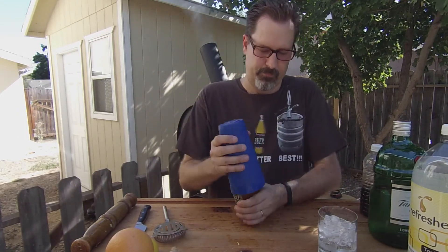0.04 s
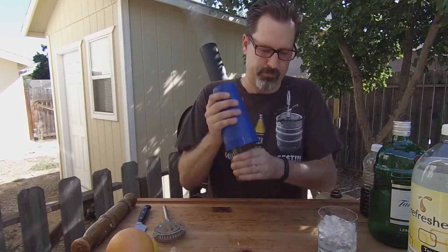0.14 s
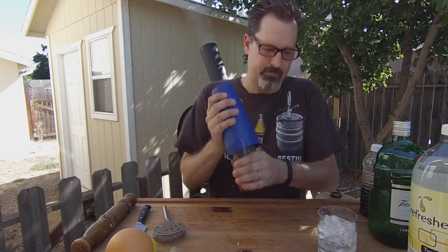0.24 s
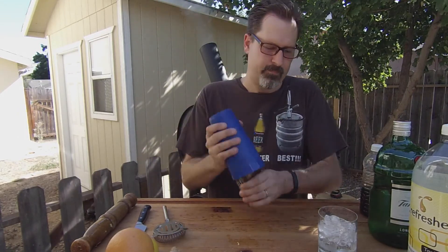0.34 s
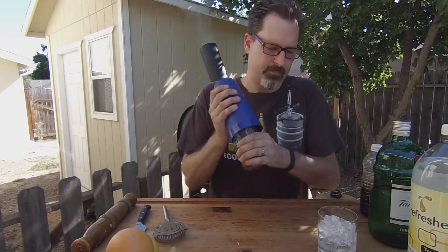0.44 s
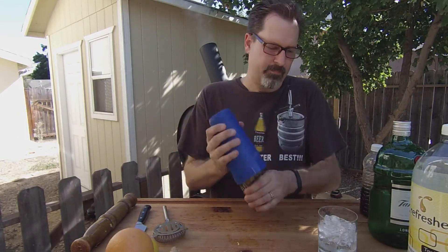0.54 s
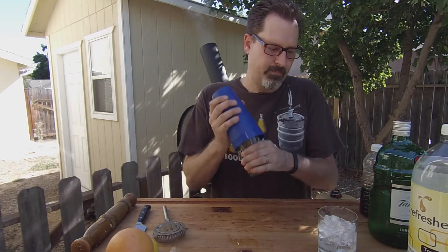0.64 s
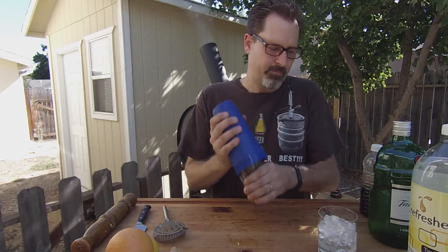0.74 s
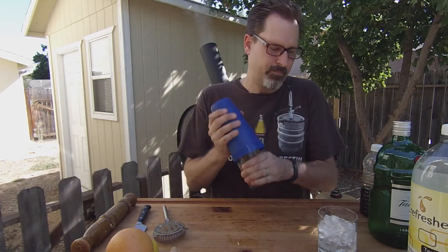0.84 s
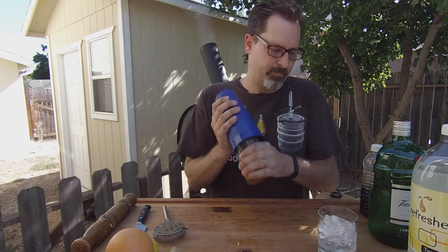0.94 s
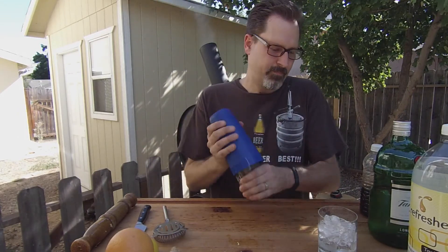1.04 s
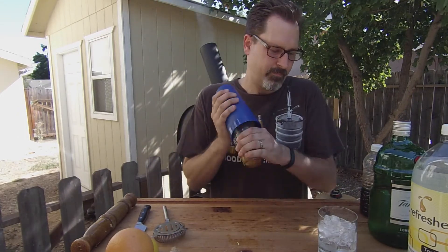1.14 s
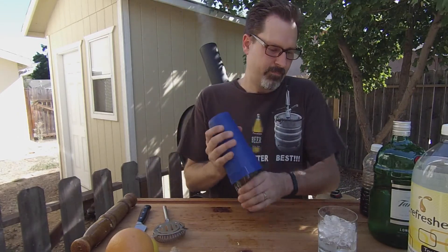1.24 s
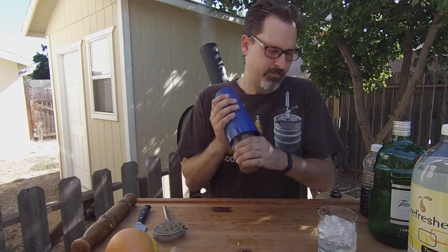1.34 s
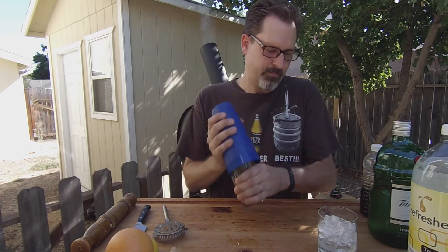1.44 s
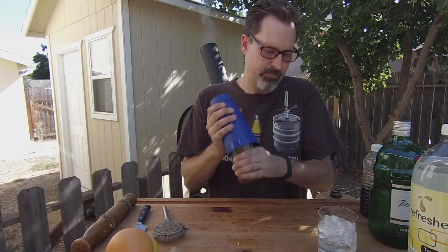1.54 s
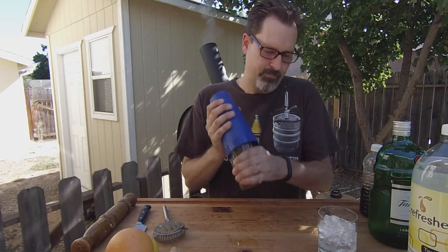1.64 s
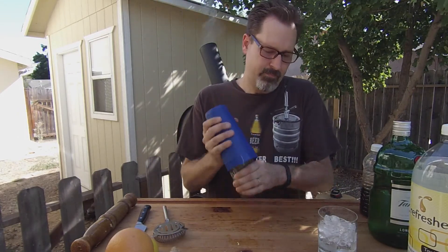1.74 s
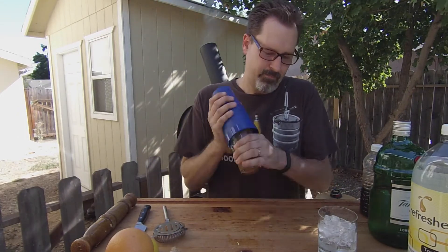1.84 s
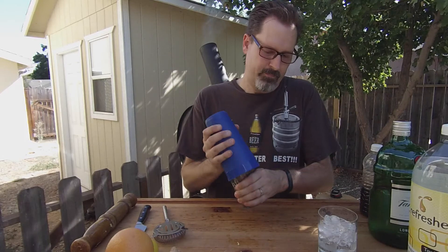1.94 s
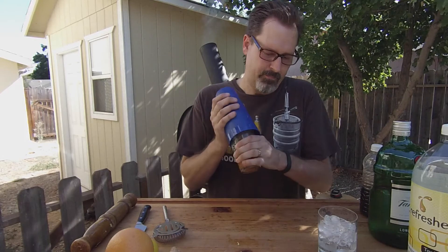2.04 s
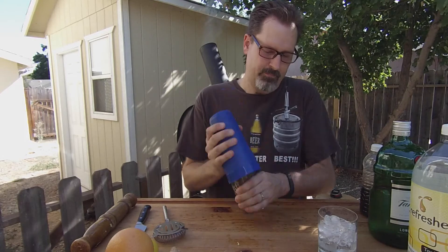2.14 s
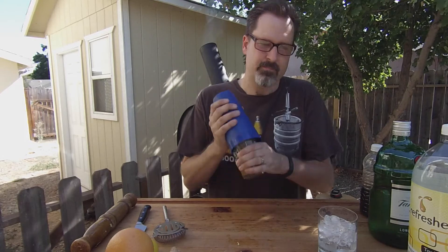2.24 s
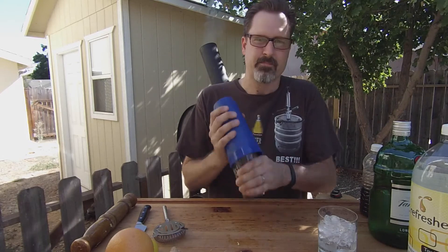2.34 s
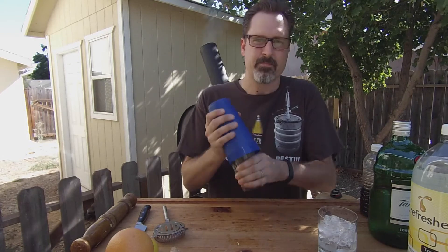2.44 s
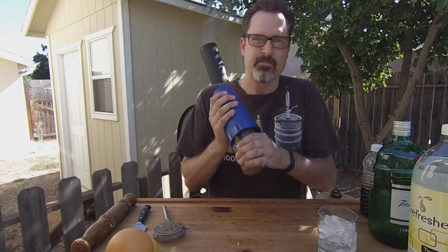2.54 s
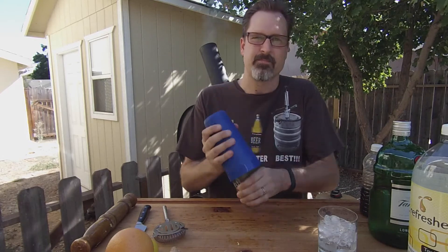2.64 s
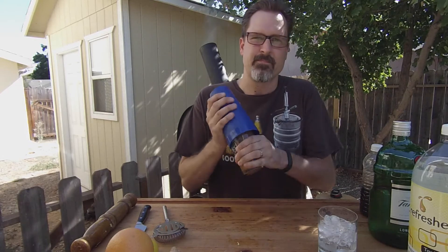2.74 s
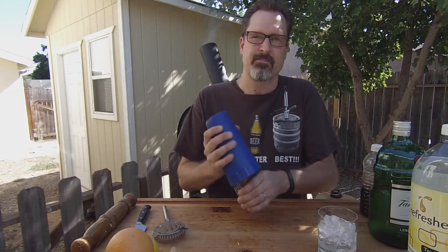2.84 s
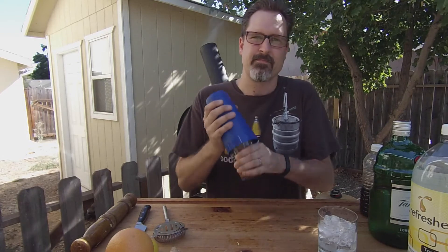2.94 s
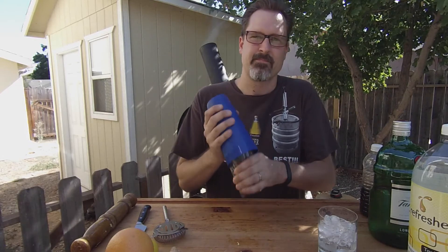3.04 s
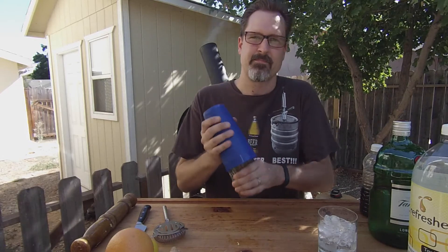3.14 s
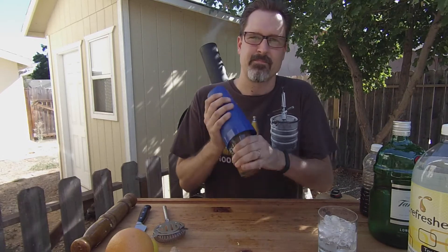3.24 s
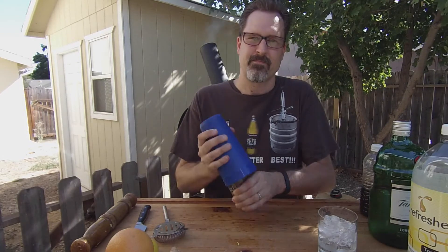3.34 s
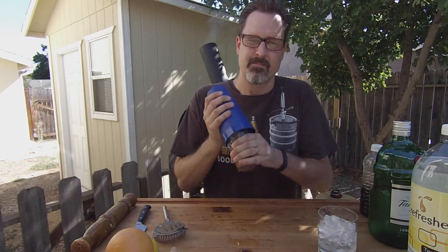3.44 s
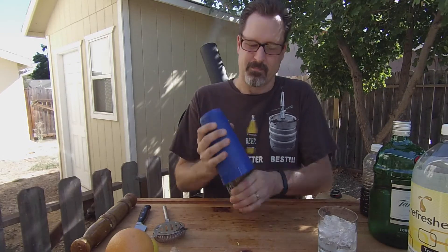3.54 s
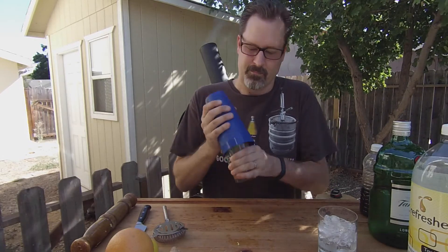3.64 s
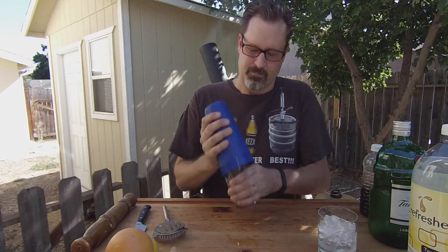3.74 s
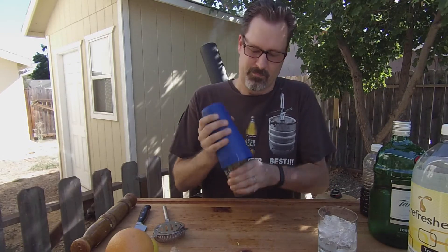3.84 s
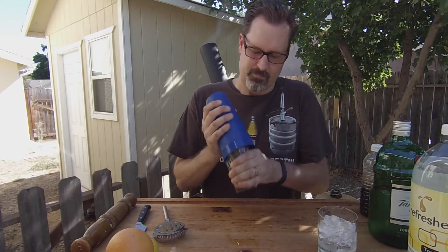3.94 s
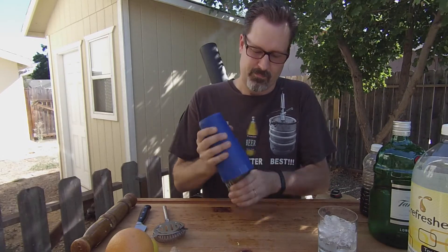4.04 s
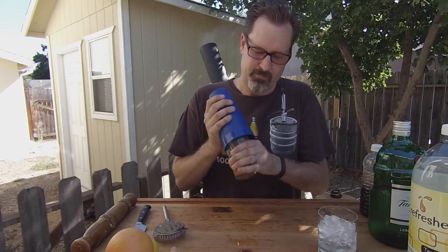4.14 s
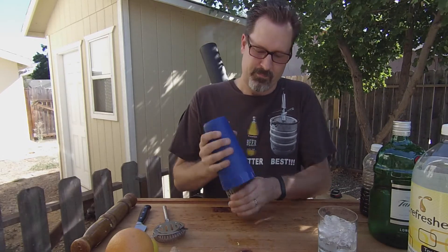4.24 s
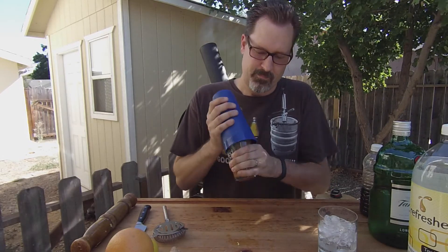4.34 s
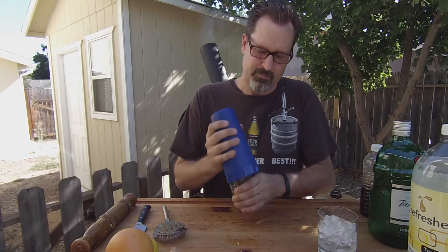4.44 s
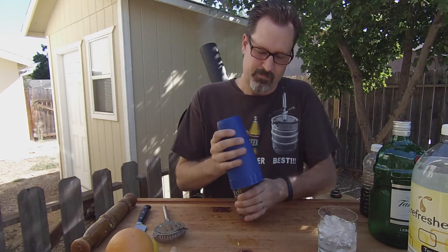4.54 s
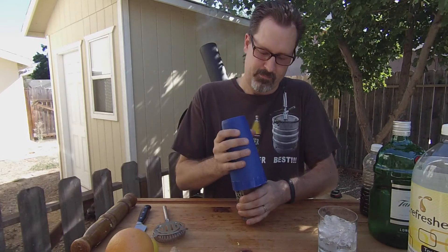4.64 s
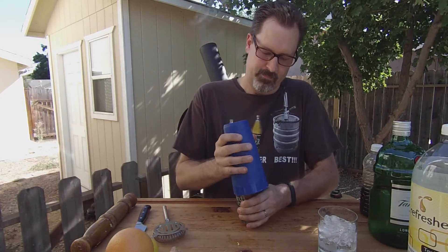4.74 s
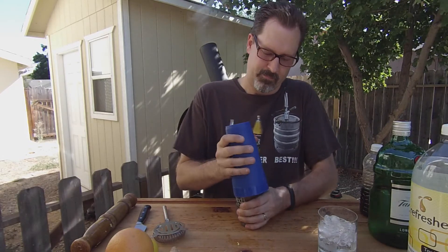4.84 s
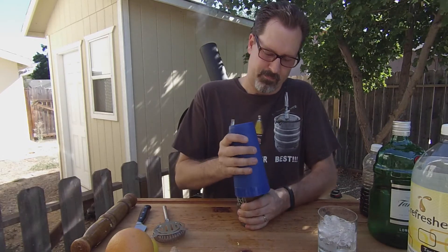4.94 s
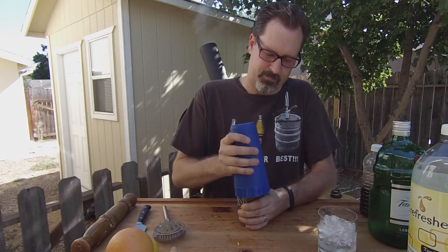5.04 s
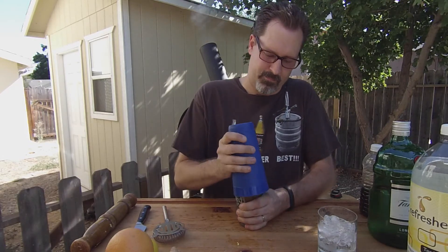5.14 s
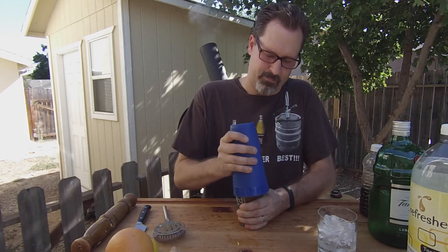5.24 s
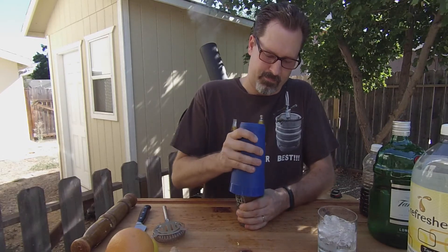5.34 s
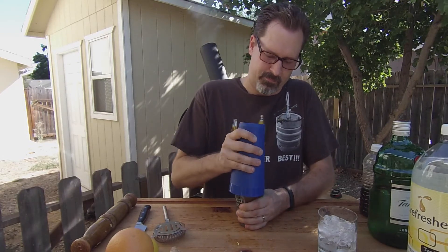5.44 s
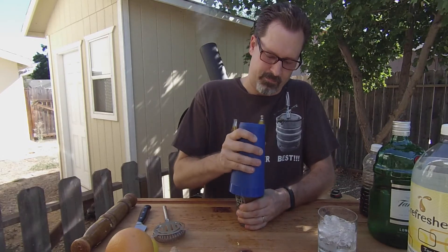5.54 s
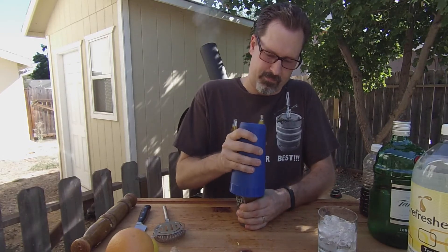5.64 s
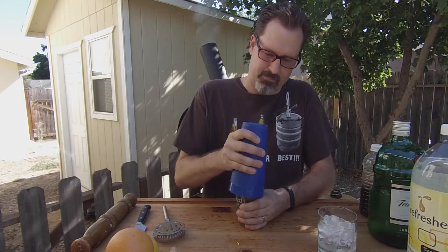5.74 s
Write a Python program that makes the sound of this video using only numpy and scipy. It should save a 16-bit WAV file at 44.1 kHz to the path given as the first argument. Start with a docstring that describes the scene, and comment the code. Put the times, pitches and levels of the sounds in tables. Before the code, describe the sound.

Quiet outdoor air with low rumble and a faint shift of ice opens the scene. At about 0.25 s a few clacks start fast, hard shaking that continues to about 4.6 s. Roughly every 0.23 s a bright burst of cubes strikes the metal end, short and crackling with a brief damped metallic ring; about a tenth of a second later the load slams into the glass end with a wet slap and hollow plop around 1 kHz, its pitch varying. Loose rattle and hissing slush fill the gaps. The first metal hit, near 0.37 s, is especially bright; later surges are slightly softer. Shaking stops abruptly around 4.7 s. At 4.83 s the glass lands on a wooden table with a short, dull knock, followed by faint bumps at 5.0 and 5.13 s and a clearer double knock at 5.28 s. Ice ticks and settles near 5.35 s, leaving quiet air. Close sound, weak yard echoes.

```python
"""Ice shaken in a metal shaker

Ice and liquid surge from end to end of a metal shaker capped over a glass, in a fenced back yard.
Cubes rattle and clack as filtered noise and brief rings; liquid slaps into resonant pockets of air.
The shaking stops, the glass is set down on a wooden table, rocks, and the ice settles.
The table sounds as a bank of dying modes, the yard as scattered echoes over a hush and low rumble."""
import sys
import numpy as np
from scipy import signal
from scipy.io import wavfile
from scipy.ndimage import uniform_filter1d

SR = 44100
rng = np.random.default_rng(int(sys.argv[2]) if len(sys.argv) > 2 else 0)


def pcm_store(signal):
    """Save signal as 16-bit PCM."""
    levels = np.round(np.clip(np.atleast_2d(signal), -1, 1) * 32767)
    wavfile.write(sys.argv[1], SR, levels.astype(np.int16).T)


N = 255339

# Surges of ice: a first jerk, then each hit on the metal end: (time [s], relative level [dB],
# length [s], brightness [dB], delay of the fall after it [s], relative level of the fall [dB])
ICE_SURGES = [(0.303, -21, 0.024, 3, 0.15, -51), (.37, -18.5, .03, 14.5, 0.15, -23),
              (0.62, -21, .036, 3.5, 0.11, -28.5), (0.849, -19.5, 0.035, 3.5, 0.13, -25),
              (1.079, -20, 0.031, 4.5, 0.13, -26.5), (1.306, -20.5, 0.039, 3, 0.15, -26),
              (1.532, -17, .023, 2.5, 0.12, -27), (1.775, -20.5, .031, 2.5, 0.11, -25.5),
              (1.989, -20.5, 0.026, 3, .14, -28.5), (2.238, -19.5, .027, 5, 0.11, -28),
              (2.453, -20, .028, 4.5, 0.14, -29), (2.697, -23.5, 0.032, 4.5, .12, -29),
              (2.922, -18, .029, 4.5, 0.13, -28), (3.166, -21, .027, 2, .135, -27),
              (3.401, -21, 0.027, 1, 0.12, -28.5), (3.629, -24, 0.025, 2.5, 0.12, -30.5),
              (3.853, -23, 0.038, 2, 0.13, -29.5), (4.078, -21.5, .026, 5.5, 0.1, -29),
              (4.314, -22.5, 0.028, 4, 0.13, -28), (4.566, -25.5, 0.039, 6, 0.067, -46)]
# The load slams into the glass and shuts on a pocket of air, the larger the lower:
# (time [s], relative liquid level [dB], pocket pitch [Hz], relative ice level [dB])
GLASS_SLAMS = [(.312, -11.5, 1420, -18), (0.5119, -9, 1303, -9), (0.7213, -19.5, 1400, -12.5),
               (0.7802, -18.5, 1080, -20), (.8008, -19, 1030, -24), (0.9823, -14.5, 1345, -31),
               (1.2104, -17.5, 1095, -31), (1.2187, -13, 1090, -16), (1.2242, -21.5, 670, -28),
               (1.4467, -18, 794, -15.5), (1.6463, -15.5, 1140, -10.5), (1.6954, -21, 960, -42),
               (1.871, -21, 1440, -26), (1.8856, -10.5, 1090, -28), (2.1298, -14.5, 890, -14.5),
               (2.345, -16, 1250, -13.5), (2.397, -20.5, 880, -36), (2.541, -12.5, 1510, -9.5),
               (2.819, -7, 986, -12), (3.063, -17, 964, -29), (3.0853, -18, 910, -37),
               (3.3324, -20.5, 975, -22.5), (3.5446, -15.5, 1310, -25.5), (3.7295, -12, 1014, -9.5),
               (3.7623, -17.5, 833, -20.5), (3.967, -12.5, 1390, -11), (3.997, -18, 690, -23.5),
               (4.185, -13.5, 1046, -16), (4.2158, -19.5, 1490, -19), (4.3867, -19.5, 1340, -7),
               (4.4326, -25, 1360, -27)]
# Spectrum of ice in the liquid: (frequency [Hz], relative spectral level [dB])
LIQUID_COLOUR = [(120, -37.5), (300, -12), (550, -1), (900, -7), (1400, 4), (2200, 2), (3200, -1.5),
                 (4600, -4), (7500, -14), (10500, -49), (14500, -29.5)]


def gain_of(db):
    """Level in decibels as an amplitude ratio."""
    return 10 ** (np.asarray(db) / 20)


def evened(x):
    """Normalisation to unit rms, the root of the mean power."""
    return x / np.sqrt(np.mean(x ** 2) + 1e-20)


def seconds(size):
    """Sampling: a time axis of so many samples."""
    return np.arange(size) / SR


def add(mix, s, sound):
    """Superposition: a sound is summed into the mix, in place, at time s."""
    part = mix[max(round(s * SR), 0):][:len(sound)]
    part += sound[:len(part)]


def level(rows):
    """Amplitude envelope, linear in decibels between rows of (time [s], level [dB])."""
    return gain_of(np.interp(seconds(N), *np.transpose(rows)))


def coloured(x, points, size=4096):
    """Minimum-phase filtering: a causal response of unit energy with the given spectrum."""
    hz, db = np.transpose(points)
    log_hz = np.log(abs(np.fft.fftfreq(size, 1 / SR)) + 1)
    log_gain = np.log(gain_of(np.interp(log_hz, np.log(hz), db)))
    # The Hilbert transform of the log gain gives the minimum phase.
    spectrum = np.exp(np.conj(signal.hilbert(log_gain)))
    taps = np.fft.ifft(spectrum).real[:size // 2]
    return signal.oaconvolve(x, taps / np.linalg.norm(taps))[:len(x)]


def ring(t, hz, t60):
    """Damped free vibration: one mode that falls by 60 dB in t60 seconds."""
    return np.sin(2 * np.pi * hz * t) * gain_of(-60 * t / t60)


def air(hush_db=-52, rumble_db=-2.0, puff_s=0.028):
    """Broadband ambience: a steady outdoor hush, and moving air as low noise that swells in puffs."""
    # Spectrum of the still yard: (frequency [Hz], relative spectral level [dB])
    hush_colour = [(12, -21), (20, -16.5), (54, -17), (174, -9), (235, -7), (347, -11.5), (603, -18.5),
                   (865, -15.5), (1140, -22.5), (10200, -43), (13100, -49), (15000, -87)]
    # Low rumble of moving air: (time [s], relative level [dB])
    rumble_levels = [(0, -41.5), (.3, -41.5), (1.6, -39.5), (1.9, -46.5), (2.5, -49.5), (3.2, -45),
                     (3.8, -49.5), (5.1, -44.5), (5.79, -52)]
    # Spectrum of the rumble: (frequency [Hz], relative spectral level [dB])
    rumble_colour = [(15, -8), (42, 3.5), (70, -4), (110, -2), (160, -18), (300, -26), (1000, -77)]
    # Puffs of air on the microphone: (time [s], relative level [dB])
    puffs = [(.49, -37.5), (1.25, -36), (2.84, -34)]
    hush, rumble = rng.standard_normal((2, N))
    breeze = level(rumble_levels)
    for s, db in puffs:
        breeze = breeze + gain_of(db) * np.exp(-((seconds(N) - s) / puff_s) ** 2)
    still = gain_of(hush_db) * evened(coloured(hush, hush_colour, size=16384))
    moving = gain_of(rumble_db) * breeze * evened(coloured(rumble, rumble_colour, size=16384))
    return still + moving


def yard(x, wet_db=-12.0, t60=0.4, dull_hz=4000, echoes_per_s=1500):
    """Reverberation: weak scattered echoes from table, shed and fence, as sparse decaying impulses."""
    t = seconds(size=20000)
    sparse = rng.standard_normal(len(t)) * (rng.random(len(t)) < echoes_per_s / SR)
    taps = sparse * (t > .004) * gain_of(-60 * t / t60)
    dulling = signal.butter(1, dull_hz, fs=SR, output="sos")
    tail = signal.sosfilt(dulling, taps / np.linalg.norm(taps))
    return x + gain_of(wet_db) * signal.oaconvolve(x, tail)[:N]


def knocks(lowest_hz=160, rise_s=0.0033, clatter_db=-5.5, clatter_t60=0.041, node_depth=0.32):
    """Modal excitation: the glass lands on one edge, then its whole rim; table rings, boards clatter."""
    # Glass meeting the table: (time [s], relative level [dB], pitch above which the blow is soft [Hz],
    # bass tilt [dB], pitch of the mode with a node at that spot [Hz],
    # delay of the rim's second touch [s], its level against the first [dB])
    landings = [(4.8331, -14, 900, 4, 1050, 0.0076, -10), (4.995, -29.5, 1190, 0, 390, 0.0043, -21),
                (5.133, -32, 1710, -5.5, 400, 0.0036, -18), (5.2773, -18, 1200, -7, 420, 0.00452, 4)]
    # Modes of the table with the glass on it: (frequency [Hz], relative level [dB], t60 [s])
    table_modes = [(195, -21, .09), (211, -2.5, .1), (288, -29, 0.057), (390, 5, 0.036), (452, -3, 0.05),
                   (591, -6, 0.047), (644, 0.5, 0.028), (714, 10, 0.019), (825, 6.5, 0.031),
                   (910, -8, 0.035), (1140, -3.5, 0.026), (1350, -1, 0.025), (1480, -15, 0.05),
                   (2540, -18, 0.06)]
    out, t = np.zeros(N), seconds(size=12000)
    for s, db, soft_hz, bass_db, node_hz, delay, second_db in landings:
        blow = gain_of(clatter_db - 60 * t / clatter_t60) * rng.standard_normal(len(t))
        for hz, mode_db, t60 in table_modes:
            # A mode struck near its node sounds weaker.
            node = 1 - node_depth * np.exp(-(np.log(hz / node_hz) / 0.27) ** 2)
            tilt_db = bass_db / (1 + (hz / 520) ** 4)
            blow = blow + node * gain_of(mode_db + tilt_db) * ring(t, hz, t60)
        blow = blow * (1 - np.exp(-t / rise_s))  # it takes a moment to spread across the boards
        blow = signal.sosfilt(signal.butter(3, soft_hz, fs=SR, output="sos"), blow)
        blow = signal.sosfilt(signal.butter(3, lowest_hz, "high", fs=SR, output="sos"), blow)
        add(out, s, gain_of(db) * blow)
        add(out, s + delay, gain_of(db + second_db) * blow)
    return out


def shaker(x, ring_db=-25.52, scatter_db=-7.5, scatter_t60=0.049, detune=0.033, count=9):
    """Body resonance: hits ring the wall and scatter inside; the response shifts as the load moves."""
    # Modes of the wall, damped by hands and liquid, before random detuning:
    # (frequency [Hz], relative level [dB], t60 [s])
    wall_modes = [(866, -11, 0.02), (1385, 12.5, 0.089), (2266, 4.5, 0.072), (3326, 18.5, 0.028),
                  (4060, 7, 0.33), (4430, -26, 0.083), (4900, -20, 0.051), (5700, -2, 0.057),
                  (7800, -6, .03)]
    t, out = seconds(size=4000), x
    # One of several responses is drawn at random for every 512 samples.
    place = np.repeat(rng.integers(0, count, N // 512 + 1), 512)[:N]
    for k in range(count):
        wall = np.zeros(len(t))
        for hz, db, t60 in wall_modes:
            wall += gain_of(db) * ring(t, hz * (1 + detune * rng.standard_normal()), t60)
        scatter = rng.standard_normal(len(t)) * gain_of(-60 * t / scatter_t60)
        body = gain_of(ring_db) * wall / np.linalg.norm(wall)
        body = body + gain_of(scatter_db) * scatter / np.linalg.norm(scatter)
        here = uniform_filter1d(1. * (place == k), size=128)  # smooth handover between responses
        out = out + signal.oaconvolve(x * here, body)[:N]
    return out


def softened(x, power, soft_hz=4500, firm_db=-44.5):
    """Contact time: gentle collisions stay in contact longer, which dulls them."""
    gentle = 1 / (1 + power / gain_of(firm_db) ** 2)
    dulled = signal.sosfilt(signal.butter(1, soft_hz, fs=SR, output="sos"), x)
    return (1 - gentle) * x + gentle * dulled


def surges(fall_length_s=0.045, fall_bright_db=-0.5):
    """Inertia: each surge of ice is followed by a fall, more spread out and duller."""
    throws = [(s, db, length, bright_db) for s, db, length, bright_db, _, _ in ICE_SURGES]
    falls = [(s + delay, db, fall_length_s, fall_bright_db) for s, *_, delay, db in ICE_SURGES]
    return throws + falls  # (time [s], relative level [dB], length [s], brightness [dB])


def rattle(hits_per_s=1300, crowding=.55, spread_db=7.0, grain_t60=0.0038, crack_t60=0.0067,
           ring_db=1.5, slush=0.27, calm_db=-48, calm_share=0.34, count=32):
    """Random impact process: collisions harden and crowd with each surge, over hissing churned slush."""
    # Loose ice shifting between the surges: (time [s], relative level [dB])
    tumble_levels = [(0, -57.5), (.08, -48.5), (.21, -47), (.26, -39), (4.72, -37.5), (4.78, -53),
                     (4.86, -47.5), (4.95, -56.5), (5.28, -64), (5.32, -47.5), (5.36, -45.5), (5.41, -56.5),
                     (5.74, -61.5), (5.78, -48)]
    # Spectrum of ice on metal: (frequency [Hz], relative spectral level [dB])
    metal_colour = [(120, -66.5), (300, -17), (550, -8.5), (900, -16.5), (1400, -7), (2200, 1), (3200, -1),
                    (4600, 4.5), (6000, -2), (7500, -5.5), (10500, -14.5), (14500, -27.5)]
    t, power, glint = seconds(N), level(tumble_levels) ** 2, 0
    for s, db, length, bright_db in surges():
        u = (t - s) / length
        u = np.where(u < 0, 1.8 * u, u)  # arrives faster than it scatters
        surge = (gain_of(db) / np.cosh(np.clip(u, -20, 20))) ** 2
        power, glint = power + surge, glint + surge * bright_db
    # Share of the energy on metal; brightness is half the metal-to-liquid ratio in dB.
    metal = 1 / (1 + gain_of(-2 * glint / power) ** 2)
    rate = hits_per_s * (power / power.mean() + 0.093) ** crowding
    # Ice nearly at rest rustles evenly.
    uneven_db = spread_db * (1 - calm_share / (1 + power / gain_of(calm_db) ** 2))
    sizes = gain_of(uneven_db * np.minimum(rng.exponential(1, N), 3.))
    sizes = sizes * (rng.random(N) < rate / SR) / np.sqrt(rate)
    cube, age, hits = rng.integers(0, count, N), seconds(size=400), np.zeros(N)
    for k, hz in enumerate(np.linspace(1100, 9500, count)):  # every cube has its own brief ring
        crack = rng.standard_normal(len(age)) * gain_of(-60 * age / crack_t60)
        grain = crack + gain_of(ring_db) * ring(age, hz, grain_t60)
        hits += signal.oaconvolve(sizes * (cube == k), evened(grain))[:N]
    churn = evened(evened(hits) + slush * rng.standard_normal(N))
    drive = softened(churn * np.sqrt(power), power)
    on_metal = coloured(drive * np.sqrt(metal), metal_colour)
    in_liquid = coloured(drive * np.sqrt(1 - metal), LIQUID_COLOUR)
    return (on_metal + in_liquid) / np.sqrt(2)


def cube_hits(count=2, cube_hz=3990, cube_spread=.2, second_lag_s=.0017, second_db=-1,
              stray_db=4.5, stray_spread_db=2.7, stray_spread_s=.018):
    """Scattered impacts: single clacks, two cubes in each slam, and a few strays around every surge."""
    # Single clacks of ice, loud and faint: (time [s], relative level [dB], pitch [Hz])
    single_clacks = [(.229, -29, 2100), (.2551, -17.5, 3000), (.2653, -10.5, 2700), (.3631, -7.5, 4300),
                     (.3941, -8, 4140), (.6047, -15.5, 4020), (.7608, -11, 3720), (.8847, -8.5, 3900),
                     (1.0024, -9.5, 3030), (1.104, -7, 5600), (1.8577, -9.5, 4900), (2.321, -7.5, 5300),
                     (2.6782, -6.5, 4820), (2.9587, -7.5, 4100), (3.025, -8, 3840), (3.1517, -11, 5070),
                     (3.1628, -8.5, 5160), (3.4854, -8, 4500), (3.599, -13, 4670), (3.633, -8, 4670),
                     (3.7841, -10.5, 4100), (3.871, -12, 4900), (4.0635, -8.5, 3970), (4.0771, -12.5, 4900),
                     (4.2849, -11.5, 3430), (4.2956, -8.5, 4350), (4.585, -15, 4300), (4.6612, -15, 4240),
                     (4.8092, -23.5, 5140), (4.978, -33, 4280), (5.347, -42.5, 2750), (5.3613, -28, 2900)]
    slammed, strays = [], []
    for s, _, _, db in GLASS_SLAMS:
        for lag, weaker_db in [(0, 0), (second_lag_s, second_db)]:
            hz = cube_hz * np.exp(cube_spread * rng.standard_normal())
            slammed.append((s + lag, db + weaker_db, hz))
    for s, db, _, _ in surges():
        for late, hard, small in rng.standard_normal((count, 3)):
            hz = cube_hz * np.exp(cube_spread * small)
            strays.append((s + stray_spread_s * late, db + stray_db + stray_spread_db * hard, hz))
    return single_clacks + slammed + strays


def clacks(ring_t60=0.0051, contact_s=0.0012, crack_db=4.0, yield_db=-15, trim_db=-4.5):
    """Impact and free vibration: a cube crunches during contact, and rings for a few cycles."""
    # Spectrum of a hard crack: (frequency [Hz], relative spectral level [dB])
    crack_colour = [(150, -28), (500, -18), (1500, -1.5), (2600, 3.5), (4800, 4.5), (7500, -4.5),
                    (10500, -16.5), (14500, -31)]
    out, t = np.zeros(N), seconds(size=700)
    for s, db, hz in cube_hits():
        contact = rng.standard_normal(len(t)) * np.exp(-(t / contact_s) ** 2)
        crack = coloured(contact, crack_colour, size=512)
        chime = ring(t, hz, ring_t60) * (1 - np.exp(-t * hz))
        hit = evened(chime) + gain_of(crack_db) * evened(crack)
        hit = softened(hit, gain_of(db + yield_db) ** 2)
        add(out, s, gain_of(db + trim_db) * hit / np.std(hit[:SR // 500]))  # levelled on its first 2 ms
    return out


def air_pockets(count=2, gulp_lead_s=.018, gulp_db=-12.5, gulp_hz=535,
                gurgle_hz=1390, gurgle_spread=.22, gurgle_spread_s=.02):
    """Cavity closure: a pocket in each slam, a low gulp ahead of every surge, gurgles around each fall."""
    slammed = [(s, db, hz) for s, db, hz, _ in GLASS_SLAMS]
    # Liquid arrives just ahead of the ice.
    gulps = [(s - gulp_lead_s, db + gulp_db, gulp_hz * rng.uniform(0.8, 1.16))
             for s, db, *_ in ICE_SURGES]
    gurgles = []
    for s, *_, delay, db in ICE_SURGES:
        for late, small in rng.standard_normal((count, 2)):
            hz = gurgle_hz * np.exp(gurgle_spread * small)
            gurgles.append((s + delay + gurgle_spread_s * late, db, hz))
    return slammed + gulps + gurgles  # (time [s], relative level [dB], pitch [Hz])


def plops(ring_cycles=12, sag=0.16, sag_s=0.0015, slap_db=1.0, slap_t60=0.0044, slap_hz=750,
          snap=3.2, fizz=2.7, swell_db=-9.5, swell_s=0.0032, trim_db=-1.0):
    """Bubble resonance: liquid slaps an air pocket, whose pitch sags as it opens; each squeeze snaps."""
    out, t = np.zeros(N), seconds(size=2000)
    for s, db, hz in air_pockets():
        turns = np.cumsum(hz * (1 + sag * (np.exp(-t / sag_s) - .5))) / SR
        swing = np.sin(2 * np.pi * turns)
        pocket = swing * gain_of(-60 * turns / ring_cycles) * (1 - np.exp(-turns / .5))
        squeezes = np.exp(snap * swing) * gain_of(-60 * t / slap_t60)
        snaps = squeezes * (1 + fizz * rng.standard_normal(len(t)))
        cushion = 1 + (slap_hz / hz) ** 4  # a large pocket softens the slap
        slap = evened(coloured(snaps, LIQUID_COLOUR, size=1024))
        plop = evened(pocket) + gain_of(slap_db) / cushion * slap
        add(out, s, gain_of(db + trim_db) * plop / np.std(plop[:SR // 250]))  # levelled on its first 4 ms
        # Noise swells up to the slap.
        swell = coloured(rng.standard_normal(len(t)), LIQUID_COLOUR, size=1024)
        swell = swell * np.exp((t - t[-1]) / swell_s)
        add(out, s - t[-1], gain_of(db + swell_db) * swell)
    return out


def scene():
    """Superposition: shaker and table, with their echoes, over the air of the yard."""
    load = rattle() + clacks() + plops()
    return (yard(shaker(load) + knocks()) + air())[None]


def record(dry, ceiling=.9, edge_hz=15300):
    """Saturation and band limiting: the hardest peaks are rounded off, then the top is cut."""
    rounded = dry / (1 + (dry / ceiling) ** 4) ** .25
    lowpass = signal.firwin(255, edge_hz, window=("kaiser", 9), fs=SR)
    return signal.oaconvolve(rounded, lowpass[None], "same")


dry = scene()
out = record(dry)
pcm_store(out)
```